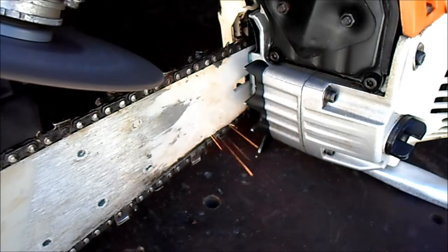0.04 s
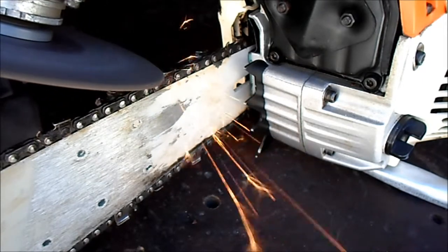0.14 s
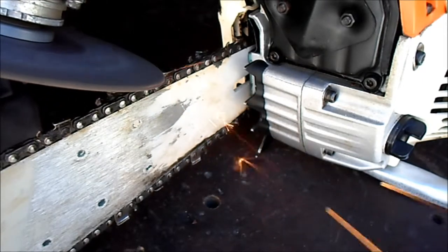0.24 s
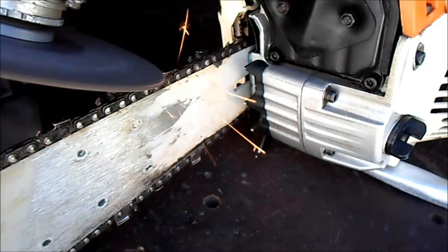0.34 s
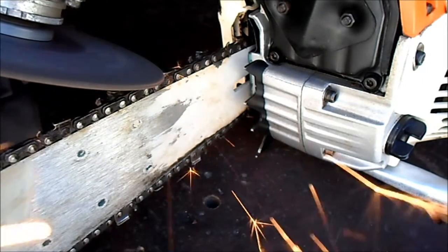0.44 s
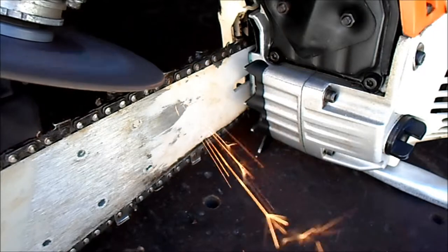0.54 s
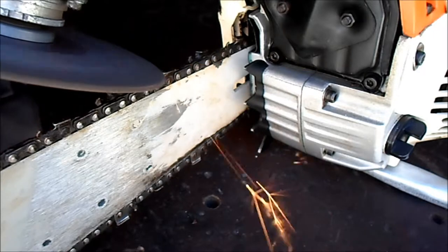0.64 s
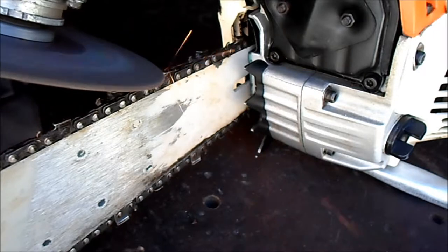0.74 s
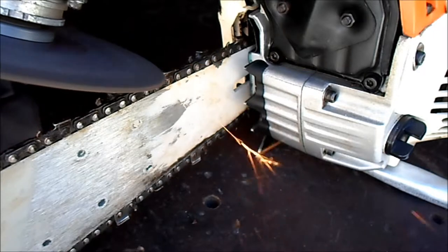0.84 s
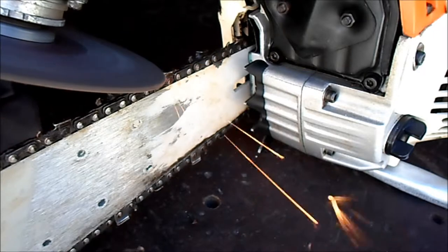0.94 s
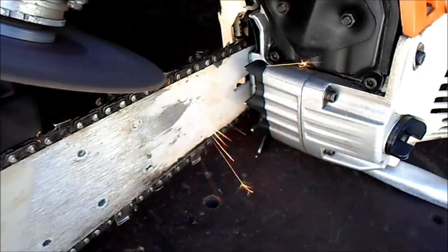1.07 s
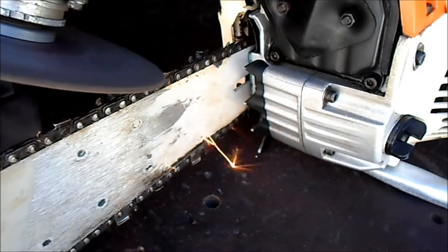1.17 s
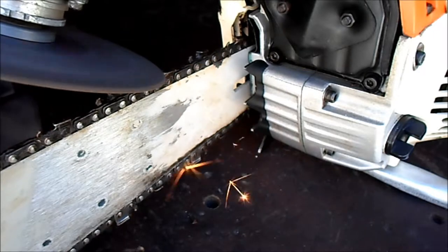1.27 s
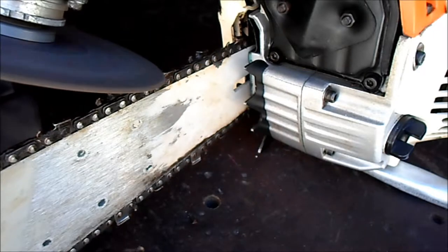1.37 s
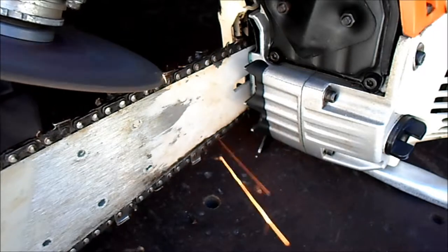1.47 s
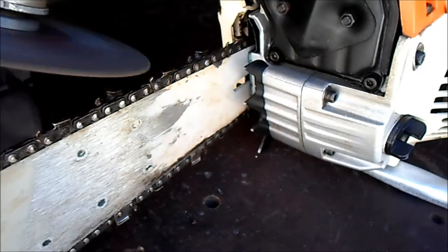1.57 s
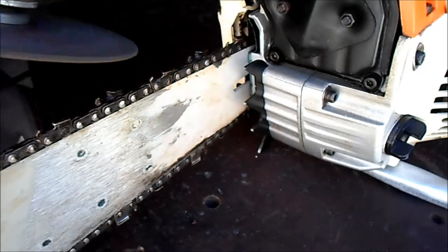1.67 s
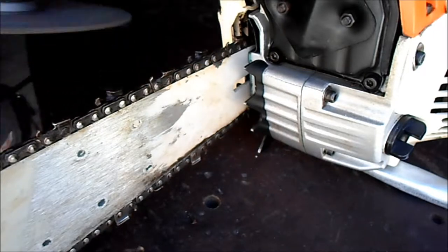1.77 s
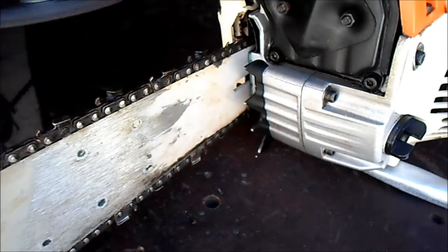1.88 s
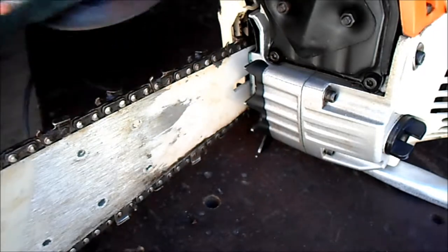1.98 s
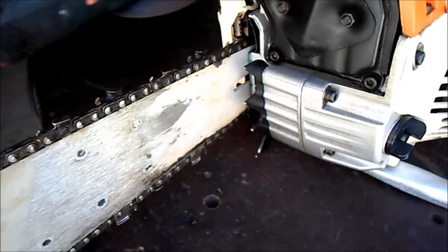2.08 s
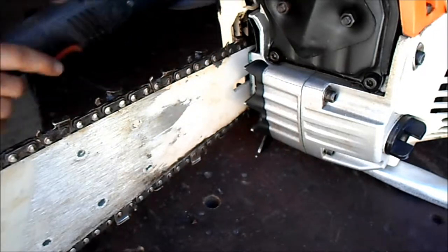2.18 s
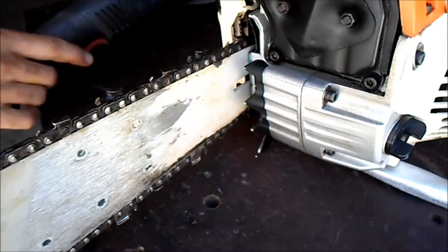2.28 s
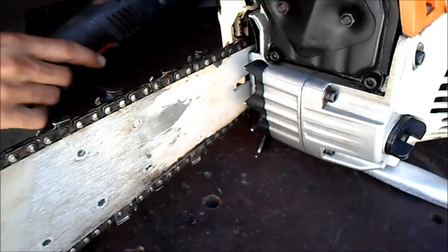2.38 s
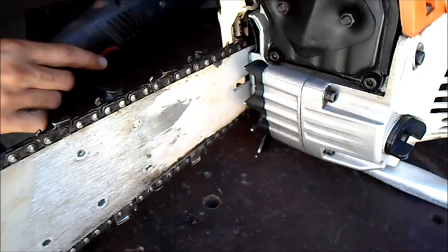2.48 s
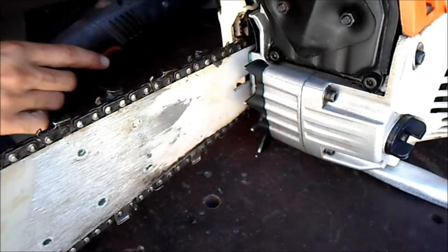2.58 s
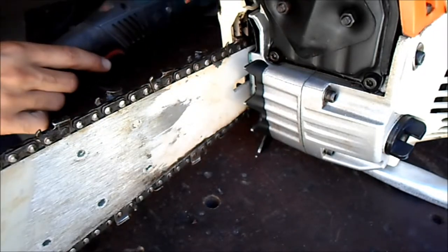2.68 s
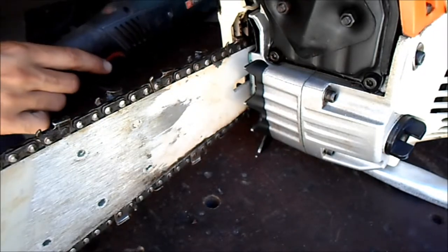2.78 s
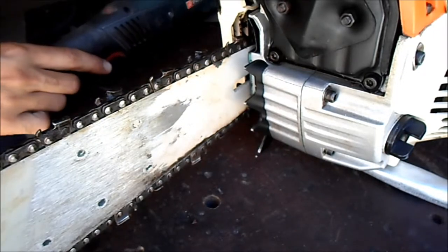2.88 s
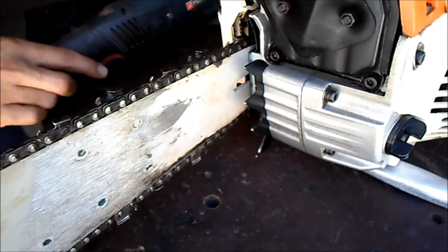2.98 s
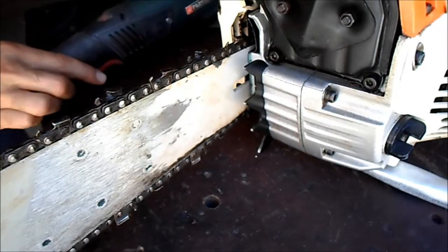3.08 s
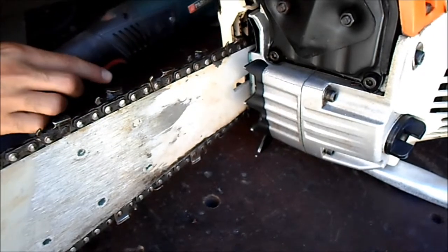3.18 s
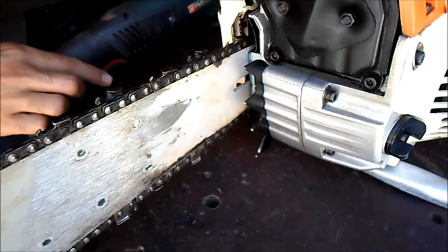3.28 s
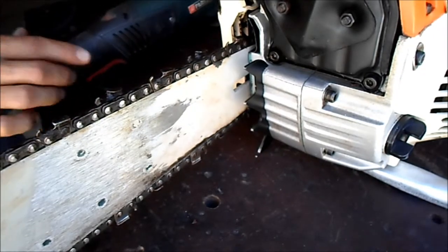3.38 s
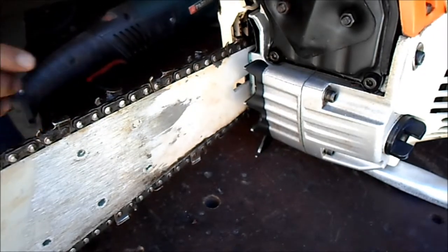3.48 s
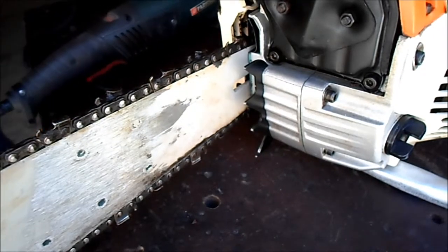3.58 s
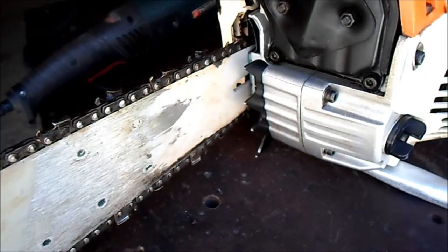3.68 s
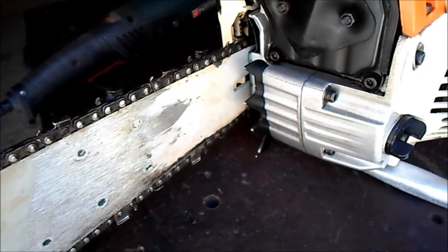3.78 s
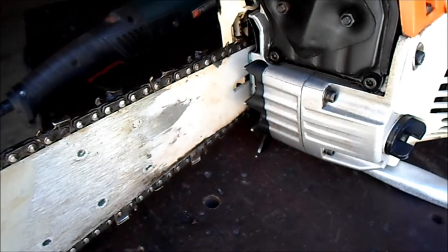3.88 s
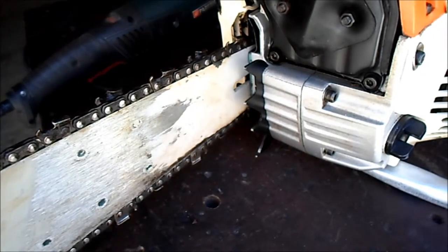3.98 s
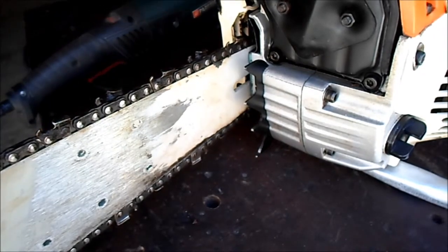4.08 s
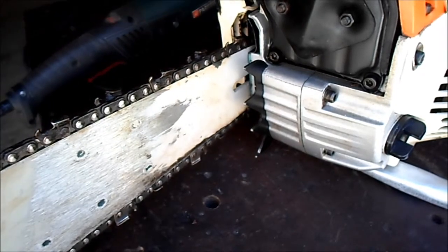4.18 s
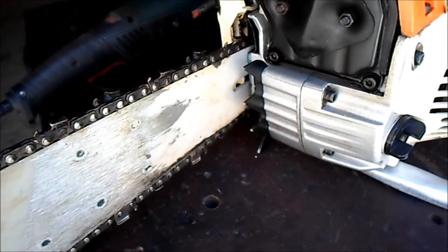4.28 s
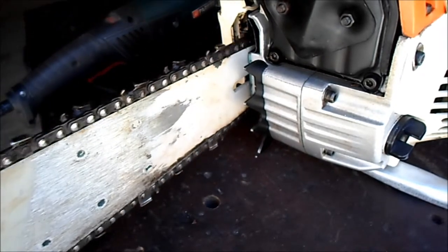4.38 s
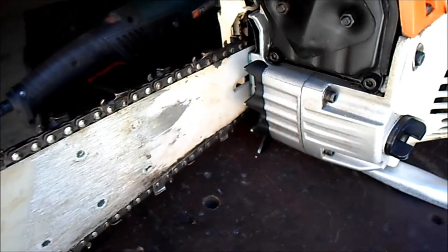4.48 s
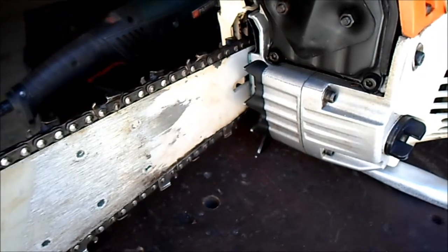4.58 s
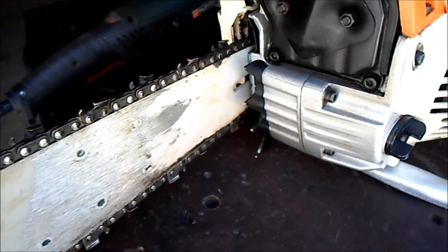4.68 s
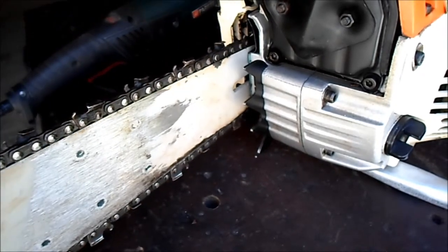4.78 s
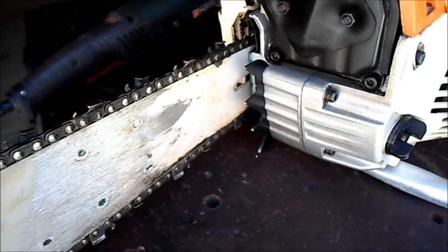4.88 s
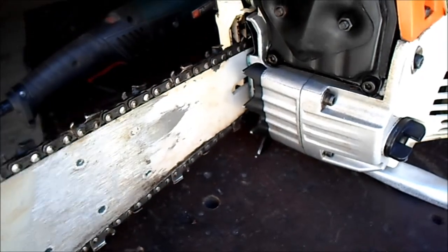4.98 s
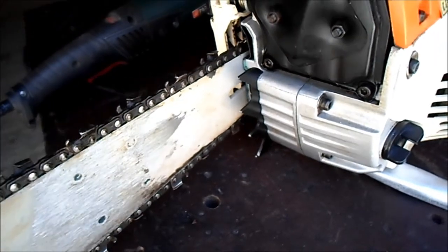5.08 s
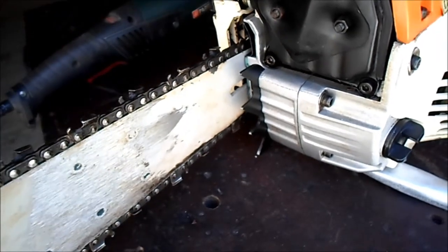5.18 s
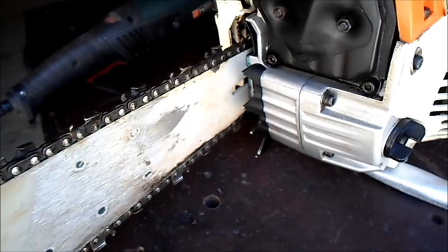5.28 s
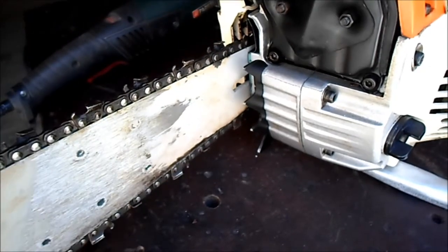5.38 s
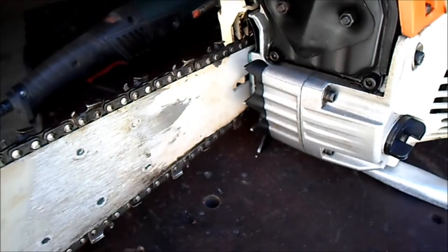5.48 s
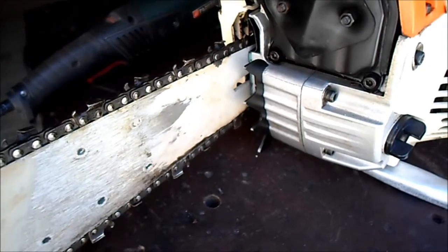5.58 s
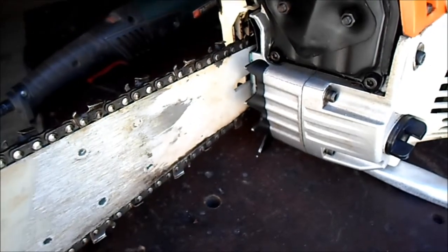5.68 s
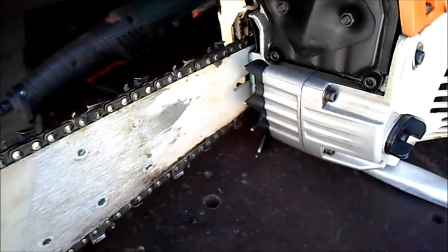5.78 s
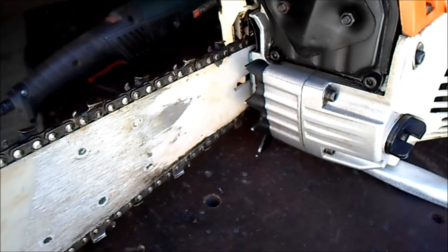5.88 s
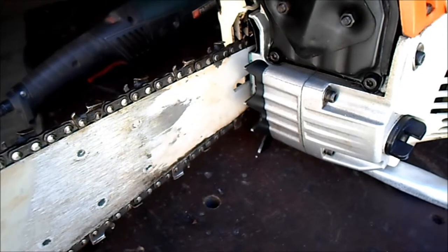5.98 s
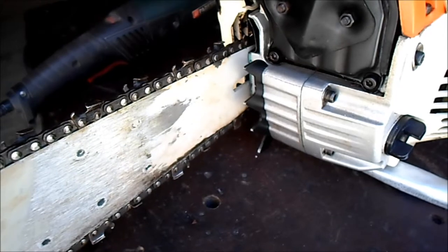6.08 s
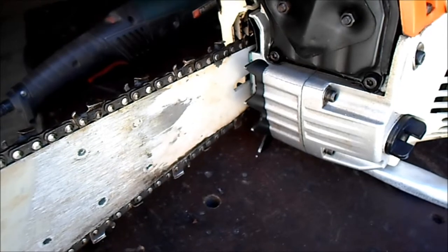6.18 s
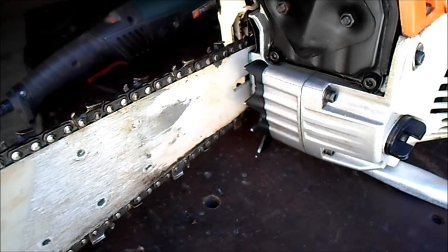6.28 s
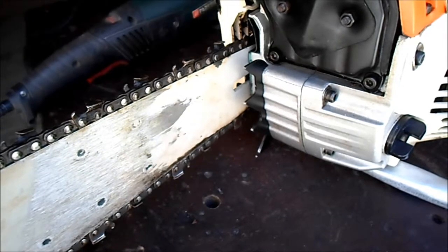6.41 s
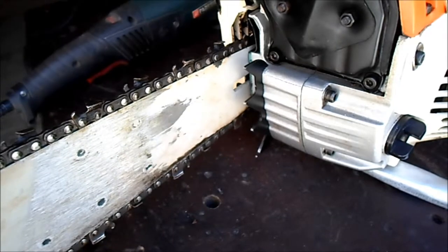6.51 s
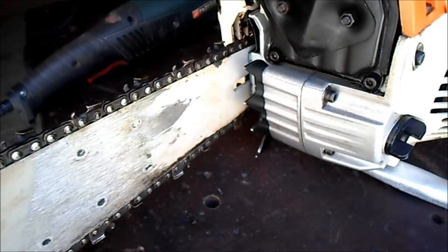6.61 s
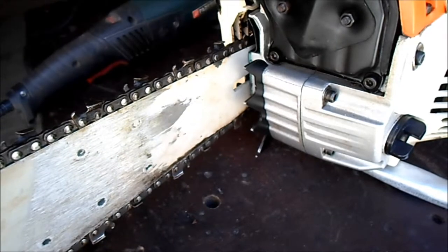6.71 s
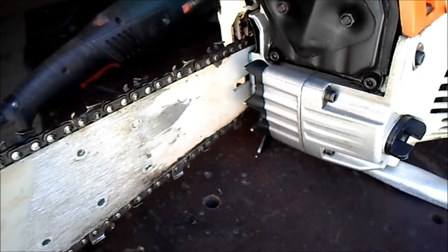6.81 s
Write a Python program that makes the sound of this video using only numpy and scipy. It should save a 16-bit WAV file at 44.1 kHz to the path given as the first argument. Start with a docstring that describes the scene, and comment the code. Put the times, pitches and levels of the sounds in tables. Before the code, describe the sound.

Close by in a small workshop, a wobbling grinder disc rasps on a saw chain, with quick metallic clanks at first and a sinking whine. The grinding ends and the tool whirrs and rattles ever slower until it is laid on the bench, stopping with a brief scrape. A low room rumble comes up, and handling of the chainsaw brings separate crisp metal clicks and dull thumps on the bench.

```python
"""An angle grinder, switched off, slows down while its wobbling disc rubs the teeth of a saw chain.
Lifted clear, it runs on with rattling gears, is laid on the workbench, and the disc scrapes to a stop.
An automatic gain control, which turned everything down during the grinding, lets the low rumble of
the workshop swell back. Then the chainsaw is handled: sharp steel clicks and dull knocks on the bench."""
import sys
import numpy as np
from scipy import signal
from scipy.fft import rfft, irfft
from scipy.io import wavfile
from scipy.ndimage import uniform_filter1d

SR = 44100
rng = np.random.default_rng(int(sys.argv[2]) if len(sys.argv) > 2 else 0)


def unload_wav(signal):
    """Save mono or channel-first audio to the path in sys.argv[1] as 16-bit WAV at rate SR, clipped to [-1, 1]."""
    wavfile.write(
        sys.argv[1],
        SR,
        np.round(np.clip(np.atleast_2d(signal).T, -1, 1) * 32767).astype(np.int16),
    )


N = 302085
T = np.arange(N) / SR
LIFT_S = 1.741  # the disc leaves the chain
DRAG_START_S, DRAG_STOP_S = 3.245, 3.395  # the disc scrapes the bench


def amp(db):
    """Turns decibels into a gain."""
    return 10 ** (np.asarray(db) / 20)


def unit(x):
    """Scales a signal to an average (rms) strength of 1."""
    return x / np.sqrt(np.mean(x ** 2) + 1e-20)


def curve(rows, column=1):
    """Joins the points of a time table, giving a value at every sample."""
    rows = np.array(rows)
    return np.interp(T, rows[:, 0], rows[:, column])


def look_up(points, hz):
    """Reads between a table's points on a logarithmic frequency scale."""
    freqs, values = np.transpose(points)
    return np.interp(np.log(hz + 1), np.log(freqs + 1), values)


def until(end_s, fade_s):
    """A gain of 1 that fades to 0 by the end time."""
    return np.clip((end_s - T) / fade_s, 0, 1)


def add(mix, start_s, sound):
    """Mixes a sound in at a given time."""
    part = mix[max(round(start_s * SR), 0):][:len(sound)]
    part += sound[:len(part)]


def colour(x, spectrum, size=4096):
    """Gives a sound a tone colour, using a minimum-phase filter: nothing rings before a hit."""
    hz = abs(np.fft.fftfreq(size, 1 / SR))
    log_gain = np.log(amp(np.maximum(look_up(spectrum, hz), -100)))
    taps = np.fft.ifft(np.exp(np.conj(signal.hilbert(log_gain)))).real[:size // 2]
    return signal.oaconvolve(x, taps / np.linalg.norm(taps))[:len(x)]


def resonate(x, modes):
    """Lets a force shake an object's natural tones (modes); neighbours swing opposite ways."""
    out = np.zeros(len(x))
    for k, (hz, width, db) in enumerate(modes):
        keep = np.exp(-np.pi * width / SR)
        pole = keep * np.exp(2j * np.pi * hz / SR)
        out += (-1) ** k * amp(db) * signal.lfilter([1 - keep], [1, -pole], x).real
    return out


def ring(modes, detune):
    """One blow: slightly mistuned tones, each fading by 60 dB over its ring time."""
    t = np.arange(16384) / SR
    tuning = 1 + detune * rng.standard_normal(len(modes))
    return sum((-1) ** k * amp(db - 60 * t / ring_s) * np.sin(2 * np.pi * hz * tuning[k] * t)
               for k, (hz, db, ring_s) in enumerate(modes))


def wander(rate):
    """A smooth random wobble that changes about `rate` times a second."""
    smoothing = np.exp(-(np.fft.rfftfreq(N, 1 / SR) / rate) ** 2)
    return unit(irfft(rfft(rng.standard_normal(N)) * smoothing, N))


def crackle(count):
    """Tiny impacts of equal strength and random direction."""
    return rng.choice([-1., 1.], count)


def roughness(turns, wear_turns, points):
    """Random bumps round a spinning part: they come back every turn and slowly wear away."""
    fresh = rng.standard_normal((200, points))  # one row per turn
    bumps = signal.lfilter([1], [1, -np.exp(-1 / wear_turns)], fresh, axis=0)[40:].ravel()
    return unit(np.interp((turns - turns[0]) * points, np.arange(len(bumps)), bumps))


# Tone colours of the workshop's rumble and air: (frequency [Hz], relative level [dB])
RUMBLE_COLOUR = [(12, -27), (20, -6), (32, 1), (42, 8.5), (59, 0.5), (82, 3.5), (101, 1), (166, -12.5),
                 (201, -21), (300, -36), (376, -16.5), (400, -36.5), (520, -58), (880, -120)]
AIR_COLOUR = [(120, -16.5), (200, -3), (413, -9), (571, -11), (720, -12.5), (908, -15), (1400, -14),
              (2360, -22.5), (2930, -26), (8000, -39), (10400, -57), (17600, -120)]


def background(rumble_db=-35.5, air_db=-47.5, hiss_db=-62):
    """A lumpy rumble, the steady air of the workshop and a faint hiss."""
    rumble = unit(colour(rng.standard_normal(N), RUMBLE_COLOUR, size=16384)) * amp(0.5 * wander(2))
    air = unit(colour(rng.standard_normal(N), AIR_COLOUR))
    return amp(rumble_db) * rumble + amp(air_db) * air + amp(hiss_db) * rng.standard_normal(N)


# How long the room echoes: (frequency [Hz], time to fade by 60 dB [s])
ECHO_TIMES = [(100, 0.15), (400, 0.39), (1000, 0.43), (3000, 0.3), (8000, 0.31), (16000, 0.063)]


def room(x, delay_s=0.0043):
    """A blur of reflections, each pitch range dying away at its own speed."""
    hz, t, bands = signal.stft(rng.standard_normal(SR // 2), SR, nperseg=256)
    fade = amp(-60 * t / look_up(ECHO_TIMES, hz)[:, None])
    tail = signal.istft(bands * fade, SR, nperseg=256)[1]
    tail *= np.clip(np.arange(len(tail)) / SR / delay_s - 1, 0, 1)
    return signal.fftconvolve(x, tail / np.linalg.norm(tail))[:N]


# Strokes of hands and chain: (time [s], level [dB], half length [s])
STROKES = [(4.57, -53, 0.096), (4.88, -58, 0.029), (5.156, -50.5, 0.029), (5.245, -51, 0.047),
           (5.438, -48, 0.08), (5.583, -54, 0.081), (5.89, -54.5, 0.12), (6.24, -61, .02),
           (6.488, -54, 0.038)]
# Their tone colour: (frequency [Hz], relative level [dB])
STROKE_COLOUR = [(1180, -9), (2000, -13), (2300, 0), (4820, -4), (5630, -6), (15100, -4), (16000, -22.5)]


def handling(grain_db=2.5):
    """Hands and chain slide in faint grainy strokes that swell and fade."""
    hiss = unit(colour(rng.standard_normal(N) * amp(grain_db * wander(150)), STROKE_COLOUR))
    return hiss * sum(amp(db) * np.exp(-((T - s) / half) ** 2) for s, db, half in STROKES)


# Rough tones from the bench: (time [s], level [dB], half length [s], pitch [Hz], bandwidth [Hz])
BENCH_TONES = [(2.467, -36, 0.028, 1060, 980), (2.83, -49, .072, 476, 120), (3.1, -28.5, 0.0072, 710, 90),
               (3.094, -36.5, 0.01, 1370, 120), (3.197, -25, 0.018, 378, 40), (3.2, -36, 0.025, 717, 90),
               (3.391, -37.5, 0.035, 393, 69), (4.649, -44.5, 0.016, 1290, 1400),
               (5.613, -21.5, 0.012, 686, 606), (5.944, -33, .0061, 850, 300)]


def bench_tones(size=16384):
    """Brief rough tones from the bench: short scuffs and the bench top's low ringing."""
    out, t = np.zeros(N), (np.arange(size) - size / 2) / SR
    for s, db, half, hz, width in BENCH_TONES:
        mode, swell = [(hz, width, 0)], np.exp(-(t / half) ** 2)
        tone = resonate(resonate(crackle(size), mode), mode) * swell
        add(out, s + t[0], amp(db) * unit(tone) * np.sqrt(np.mean(swell ** 2)))
    return out


# Knocks on the bench: (time [s], relative level [dB], contact time [ms])
BENCH_KNOCKS = [(3.039, -7.5, 0.12), (3.279, -5.5, 1.2), (4.771, -33, 0.72), (5.403, -25.5, 0.14),
                (5.431, -23.5, 0.62), (5.601, -8, 1.9), (5.606, -5.5, 0.73), (5.6138, -31, 0.58),
                (5.671, -14.5, 1.8), (5.891, -22.5, 0.24), (5.966, -25, 0.47)]
# Natural tones of the bench top: (frequency [Hz], relative level [dB], ring time [s])
BENCH_MODES = [(175, -9, .1), (286, -11, .11), (335, 1, .04), (360, -20, .05), (386, 1, .16),
               (430, -8, .06), (510, -8, .11), (620, -19, .05), (745, -14, .08), (860, -16, .05),
               (980, -11, .06), (1206, -13, .06), (1410, -12, .06), (1750, -23, .05), (2300, -22, .04),
               (3300, -22, .03)]


def knocks(gain_db=-3.5, bass_cut_hz=130):
    """A soft push rings the bench top; the longer the contact, the duller the knock."""
    out, ms = np.zeros(N), np.arange(512) / SR * 1000
    for s, db, contact_ms in BENCH_KNOCKS:
        push = ms * np.exp(-3.3 * ms / contact_ms)
        knock = signal.fftconvolve(ring(BENCH_MODES, detune=0.0049), push / push.sum())
        add(out, s, amp(db + gain_db) * knock)
    # the open board gives off little bass
    return signal.sosfilt(signal.butter(2, bass_cut_hz, "high", fs=SR, output="sos"), out)


# Clicks of chain and saw: (time [s], relative level [dB], snap length [s], treble tilt [dB/octave])
SAW_CLICKS = [(3.611, -41.5, 0.0029, -1.5), (3.657, -40.5, 0.0061, -5), (4.119, -11.5, 0.0011, 1.8),
              (4.546, -14, 0.0026, 1.5), (4.568, -28, 0.0053, -7), (4.774, -25.5, 0.0027, -7.5),
              (5.361, -30, 0.0045, -5.5), (5.404, -22.5, 0.0036, -4.5), (5.431, -19.5, 0.0055, -7.5),
              (5.474, -31, 0.0024, -4.5), (5.522, -29.5, 0.0022, 3), (5.54, -32, .001, -1),
              (5.556, -31, .001, 2), (5.578, -26.5, .001, 4), (5.609, -18.5, 0.0044, -6),
              (5.846, -39, 0.015, 9), (5.888, -12.5, 0.0066, -3), (5.891, -9.5, 0.0023, 3.5),
              (5.941, -32, 0.0046, -9), (6.4991, -23.5, 0.0014, -4.5)]
# Tone colour of the saw: (frequency [Hz], relative level [dB])
SAW_COLOUR = [(200, -10.5), (800, -2), (1300, -4.5), (1750, -1.5), (2150, 3.5), (2850, -9.5), (3400, -0.5),
              (4700, -2), (5600, -7), (7500, -3.5), (9000, -10), (10200, -14), (11800, -8), (13600, -13),
              (14600, -5), (16000, -28)]
# The steel's ping after a click: (frequency [Hz], relative level [dB], ring time [s])
PING_MODES = [(2224, -18, .04), (5000, -33, .04)]


def clicks(snap_db=-2, shiver_db=-33, shiver_s=0.035, size=8192):
    """Steel snaps on steel and pings; a longer snap stirs more loose links, which shiver after it."""
    out, t = np.zeros(N), np.arange(size) / SR
    for s, db, length, tilt in SAW_CLICKS:
        stirred = min(length / .002, 1) ** 2
        shiver = stirred * amp(shiver_db) * np.exp(-t / shiver_s)
        snap = crackle(size) * (np.exp(-t / length) + shiver)
        tilted = [(hz, level + tilt * np.log2(hz / SAW_COLOUR[0][0])) for hz, level in SAW_COLOUR]
        add(out, s, amp(db + snap_db) * colour(snap, tilted))
        add(out, s, amp(db) * ring(PING_MODES, detune=0.0095))
    return out


# The disc slowing down: (time [s], speed [turns/s])
DISC_SPEED = [(0, 79), (.16, 73.6), (.55, 63.8), (1, 52.42), (1.6, 34.64), (1.8, 27), (2.05, 24.1),
              (2.35, 18.45), (2.7, 18.4), (3.26, 8.6), (3.43, 1)]


def disc_turns(zero_s=1.682):
    """Counts the disc's turns from a moment when its rim presses on the chain."""
    turns = np.cumsum(curve(DISC_SPEED)) / SR
    return turns - np.interp(zero_s, T, turns)


# Whirr of the motor's brushes and bearings: (time [s], relative level [dB])
WHIRR_LEVELS = [(1.76, -36), (1.96, -31.5), (2.25, -31), (2.65, -39.5), (3.24, -45)]
# Its tone colour: (frequency [Hz], relative level [dB])
BRUSH_COLOUR = [(180, -44), (300, -19), (1360, -15.5), (1900, -23), (3030, 0.5), (3800, -4), (4750, 2),
                (6200, -5.5), (8900, -8.5), (11000, -14.5), (12700, -18), (14800, -17), (15300, -12),
                (16000, -24)]


def whirr(turns, grain_db=4.0, repeat_share=0.61, gain_db=1):
    """Brushes hiss on the motor's spinning contacts; part repeats each turn and so sinks in pitch."""
    repeating = unit(np.diff(roughness(turns, wear_turns=16, points=1300), prepend=0))
    hiss = np.sqrt(repeat_share) * repeating + np.sqrt(1 - repeat_share) * rng.standard_normal(N)
    hiss *= amp(grain_db * roughness(turns, wear_turns=16, points=24))
    return amp(curve(WHIRR_LEVELS) + gain_db) * unit(colour(hiss, BRUSH_COLOUR)) * until(3.42, 0.22)


# Tones of gears and motor: (multiple of the disc speed, relative level [dB])
GEAR_TONES = [(2, -2), (5, -6), (7, -3), (8, -6), (12, -7), (17, -6), (25, -5), (34, -6), (46, -4),
              (49, -3), (64, -5), (74, 1.5), (77, -3), (85, -4), (94, -2), (105, -4), (116, -5), (127, -4)]
# Outline of the weaker tones from uneven teeth: (multiple of the disc speed, relative level [dB])
UNEVEN_TEETH = [(3, -8.5), (12, -13), (22, -5), (40, -10), (70, -8.5), (90, -14.5), (140, -15)]
# How well the housing gives off a tone: (frequency [Hz], relative level [dB])
HOUSING_COLOUR = [(100, -10.5), (500, -10.5), (900, -22.5), (1500, -11.5), (2100, -4.5), (3100, -5.5),
                  (3950, 3), (4450, -1.5), (5300, 7), (6100, 1.5), (7100, 5.5), (9500, 11.5), (12000, -21)]


def whine(turns, start_db=-19.5, db_per_octave=4.5, lifted_db=-13):
    """Gear and motor tones sink and fade with the speed, swelling where the housing rings along."""
    running, tones = T < DISC_SPEED[-1][0], np.zeros(N)
    angle = 2 * np.pi * (turns + .0013 * wander(70))[running]
    flutters = [amp(4 * wander(30))[running] for _ in range(7)]
    weak_tones = [(k, look_up(UNEVEN_TEETH, k)) for k in range(3, 140)]
    for multiple, db in GEAR_TONES + weak_tones:
        flutter = flutters[int(multiple) % len(flutters)]
        tones[running] += amp(db) * flutter * np.cos(multiple * angle + 2 * np.pi * rng.random())
    tones = colour(tones, HOUSING_COLOUR)
    octaves = np.log2(curve(DISC_SPEED) / DISC_SPEED[0][1])
    level = start_db + db_per_octave * octaves + lifted_db * (T > LIFT_S)
    return amp(level) * tones / np.std(tones[running])


def gear_slaps(turns, first_db=-20.5, db_per_octave=8, rebound_db=-8, scatter_db=2, jitter_s=.0007):
    """Lists (time [s], level [dB]): free gears slap once a turn and rebound half a turn later."""
    half_turns, speed = np.floor(2 * (turns + .12)), curve(DISC_SPEED)
    free = (T > LIFT_S) & (T < DRAG_START_S)
    beats = np.flatnonzero(free & (np.diff(half_turns, prepend=0) > 0))
    late, strong = rng.standard_normal((100, 2))[:len(beats)].T
    octaves = np.log2(speed[beats] / speed[free][0])
    level = first_db + db_per_octave * octaves + rebound_db * (half_turns[beats] % 2)
    return list(zip(T[beats] + jitter_s * late, level + scatter_db * strong))


# The hardest gear slaps, the last ones as the disc is braked: (time [s], relative level [dB])
HARD_SLAPS = [(1.94, -21.5), (2.0094, -18), (2.0456, -18.5), (2.094, -18), (2.136, -17.5), (2.225, -20),
              (2.3283, -19), (2.391, -19.5), (2.5444, -24), (2.601, -22), (2.6518, -23.5), (2.7696, -26.5),
              (2.826, -25), (2.8885, -26), (2.966, -22), (3.245, -25), (3.284, -14), (3.366, -19)]
# Tone colour of the gearbox: (frequency [Hz], relative level [dB])
GEARBOX_COLOUR = [(530, -55), (900, -23), (1490, -20), (2390, -6.5), (2660, -12.5), (3070, 2.5), (3550, -8),
                  (3910, -8), (4250, -12.5), (4800, -6), (5960, -16.5), (9090, -16), (13200, -30.5),
                  (15100, -23.5), (16000, -36)]


def rattle(turns, gain_db=3, rise_s=0.00075, blow_s=0.0037, chatter_s=0.009, chatter_db=-10.5):
    """Each slap, a sharp blow and a short chatter of teeth, rings the gearbox."""
    force, t = np.zeros(N), np.arange(2048) / SR
    slap = np.exp(-t / blow_s) + amp(chatter_db) * np.exp(-t / chatter_s)
    slap *= 1 - np.exp(-t / rise_s)
    # a hard slap replaces any regular one close to it
    regular = [(s, db) for s, db in gear_slaps(turns)
               if all(abs(s - hard_s) > .016 for hard_s, _ in HARD_SLAPS)]
    for s, db in regular + HARD_SLAPS:
        add(force, s, amp(db) * slap)
    return amp(gain_db) * colour(force * crackle(N), GEARBOX_COLOUR)


# Natural tones of the disc: (frequency [Hz], bandwidth [Hz], relative level [dB])
DISC_MODES = [(1615, 15, -9), (2410, 78, 1), (3380, 70, -0.5), (4130, 120, -12), (5100, 210, -18),
              (6930, 120, -9.5), (9700, 81, -24), (10800, 57, -29.5), (11900, 72, -16.5)]
# Tone colour of its scrape on the bench: (frequency [Hz], relative level [dB])
SCRAPE_COLOUR = [(290, -50.5), (500, -11), (974, -7.5), (1210, -15), (1570, -10.5), (1950, -9.5),
                 (2390, -3.5), (2730, -12.5), (3250, -4), (3700, -17.5), (12500, -18.5), (13800, -16),
                 (16000, -15.5)]


def scrape(level_db=-28.5, grain_db=2, attack_s=0.021, bite_db=11, bite_s=0.031, fade_db_per_s=450):
    """The rim bites into the bench, scrapes on more lightly, and the disc rings until it stops."""
    attack = np.clip((T - DRAG_START_S) / attack_s, 0, 1) ** 2
    bite = bite_db * np.exp(-np.maximum(T - DRAG_START_S - attack_s, 0) / bite_s)
    fade = fade_db_per_s * np.maximum(T - DRAG_STOP_S, 0)
    friction = unit(rng.standard_normal(N) * amp(grain_db * wander(500)))
    force = friction * attack * amp(level_db + bite - fade)
    return np.std(force) * (unit(resonate(force, DISC_MODES)) + unit(colour(force, SCRAPE_COLOUR)))


# The disc catches a chain tooth: (time [s], relative level [dB])
TOOTH_CATCHES = [(.044, -7.5), (0.087, -4), (.128, -5.5), (.172, -12), (0.208, -9.5), (.249, -6.5),
                 (.292, -5.5), (0.595, -13)]
# Natural tones of the bar that guides the chain: (frequency [Hz], relative level [dB], ring time [s])
BAR_MODES = [(2408, -1.5, .018), (2590, -0.5, .02), (2700, -23.5, 0.017), (3190, -3, 0.033),
             (5320, 5, 0.011), (8000, -14, 0.014)]


def clanks(second_db=-3, max_gap_s=0.0032):
    """A tooth is caught and let go: two quick blows on the guide bar."""
    out = np.zeros(N)
    for s, db in TOOTH_CATCHES:
        add(out, s, amp(db) * ring(BAR_MODES, detune=0.016))
        let_go_s = s + max_gap_s * rng.uniform(0.83, 1.0)
        add(out, let_go_s, amp(db + second_db) * ring(BAR_MODES, detune=0.0092))
    return out


# Disc on chain: (time [s], level [dB], lows compared with highs [dB], dip once a turn [dB])
GRIND_LEVELS = [(0, -13, -4, 9), (.15, -7.5, -9.5, 2), (.22, -10, -9, 7.5), (.9, -7.5, -12.5, 8),
                (1.1, -5.5, -10.5, 3), (1.35, -5, -11, 7.5), (1.58, -9, -11, 10), (1.72, -7.5, -10, 11)]
# The disc hops off the teeth: (time [s], half length [s], depth [dB])
DISC_HOPS = [(.035, .012, 6), (.226, .009, 9), (.571, .004, 12), (.823, .006, 20), (.836, .004, 16),
             (.927, .004, 7), (1.61, .008, 8)]
# Natural tones of teeth and guide bar: (frequency [Hz], bandwidth [Hz], relative level [dB])
CHAIN_MODES = [(3060, 220, -8), (3450, 200, -12), (3730, 90, -9), (4020, 80, -6), (4970, 140, -9),
               (5300, 160, -13), (6680, 90, -10), (7000, 120, -3), (7800, 150, -13), (8830, 100, -11),
               (9130, 140, -5), (9550, 150, -12), (9960, 160, -7), (11230, 180, -8), (12400, 110, -8),
               (13150, 220, 0), (13750, 240, 0), (14030, 280, 1), (15500, 300, -5)]
# Tone colour of the grinding hiss: (frequency [Hz], relative level [dB])
GRIND_COLOUR = [(120, -40), (200, 1), (1300, 4), (1500, 10), (2600, -11), (3100, 18.5), (4500, -6),
                (5100, 9.5), (6170, -5), (6900, 7), (10700, 9.5), (13800, 14.5), (14900, 18), (16000, -39)]


def grinding(turns, bumps_db=4, grit_db=4, repeat_share=0.37, hiss_db=-4, split_hz=6200):
    """Grit strikes the teeth, ringing chain and bar; once a turn the warped disc swings clear."""
    swing = np.cos(2 * np.pi * turns)
    gap = ((1 - swing) / 2) ** 3
    gap += 0.3 * ((1 + swing) / 2) ** 10  # a shallower gap half a turn later
    # the chain gives way under hard contact, so the rim's bumps level off
    bumps = np.tanh(roughness(turns, wear_turns=4, points=14))
    contact = amp(bumps_db * bumps - curve(GRIND_LEVELS, column=3) * gap)
    contact /= np.sqrt(uniform_filter1d(contact ** 2, size=4000))  # evens out slow level changes
    contact *= amp(-sum(db * np.exp(-((T - s) / half) ** 4) for s, half, db in DISC_HOPS))
    repeating = unit(np.diff(roughness(turns, wear_turns=6.7, points=900), prepend=0))
    grit = np.sqrt(repeat_share) * repeating + np.sqrt(1 - repeat_share) * crackle(N)
    force = unit(grit * amp(grit_db * wander(2500))) * contact * until(LIFT_S, .015)
    sound = unit(resonate(force, CHAIN_MODES)) + amp(hiss_db) * unit(colour(force, GRIND_COLOUR))
    lows = signal.sosfilt(signal.butter(4, split_hz, fs=SR, output="sos"), sound)
    highs = signal.sosfilt(signal.butter(4, split_hz, "high", fs=SR, output="sos"), sound)
    blend = unit(highs) + amp(curve(GRIND_LEVELS, column=2)) * unit(lows)
    touching_share = np.mean(T < LIFT_S)  # so the level counts only the time on the chain
    return np.sqrt(touching_share) * amp(curve(GRIND_LEVELS)) * blend


def scene(grinder_echo_db=-22, bench_echo_db=-12, saw_echo_db=-23):
    """All the sources, close by in a small workshop."""
    turns = disc_turns()
    grinder = grinding(turns) + clanks() + whine(turns) + whirr(turns) + rattle(turns) + scrape()
    bench, saw = knocks() + bench_tones(), clicks()
    echo = room(amp(grinder_echo_db) * grinder + amp(bench_echo_db) * bench + amp(saw_echo_db) * saw)
    return (grinder + bench + saw + echo + handling() + background())[None]


def record(dry, limit_db=-21.5, average_s=0.16, recovery_db_per_s=15, top_hz=15850):
    """Gain control turns loud moments down and slowly comes back up; the highest treble is cut."""
    power, keep = dry[0] ** 2, np.exp(-1 / (average_s * SR))
    start_power = np.mean(power[T < 2 * average_s])
    average = signal.lfilter([1 - keep], [1, -keep], power, zi=[start_power])[0]
    over_db = np.maximum(10 * np.log10(average + 1e-12) - limit_db, 0)
    recovery_db = recovery_db_per_s * T
    held = dry * amp(recovery_db - np.maximum.accumulate(over_db + recovery_db))
    treble_cut = signal.firwin(511, top_hz, window=("kaiser", 9), fs=SR)
    return signal.oaconvolve(held, treble_cut[None], "same")


dry = scene()
out = record(dry)
unload_wav(out)
```